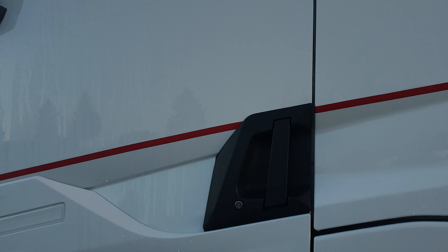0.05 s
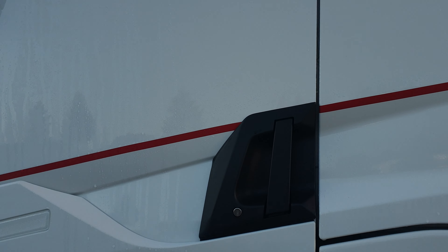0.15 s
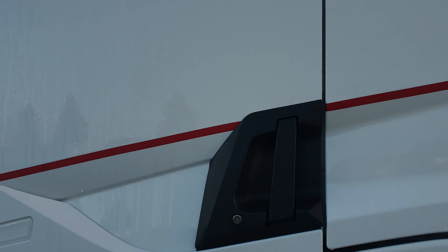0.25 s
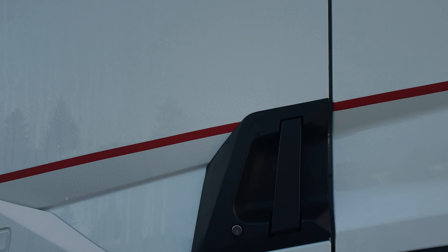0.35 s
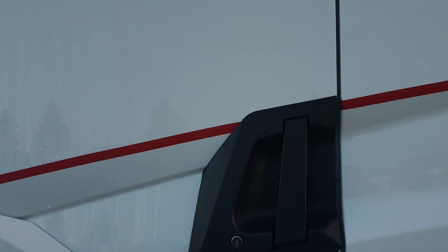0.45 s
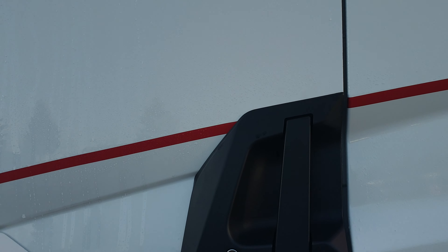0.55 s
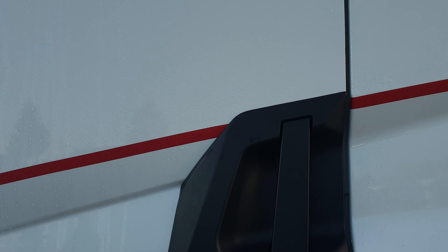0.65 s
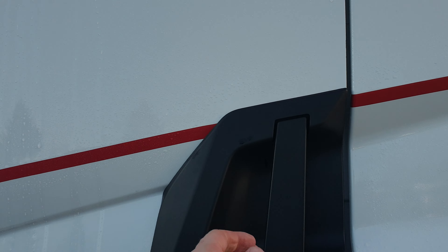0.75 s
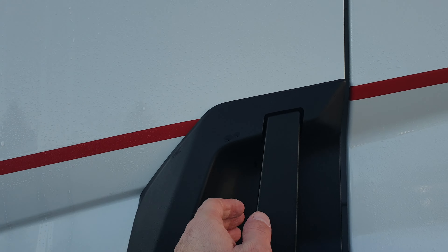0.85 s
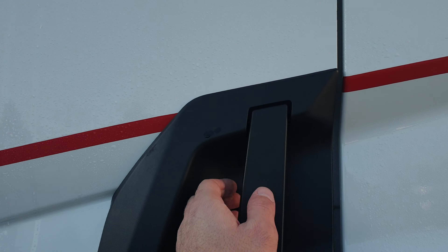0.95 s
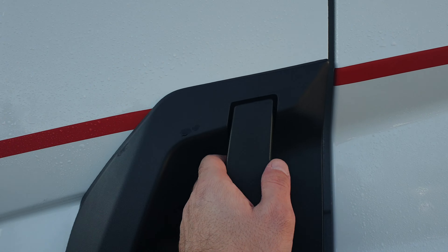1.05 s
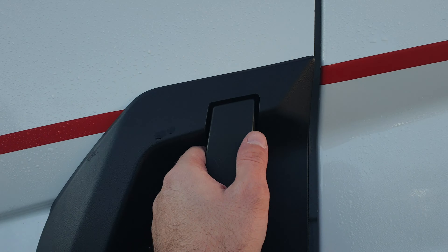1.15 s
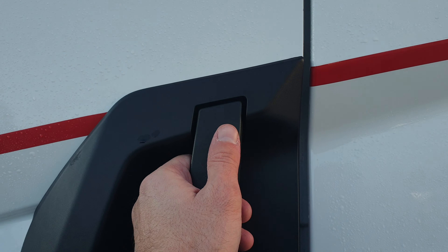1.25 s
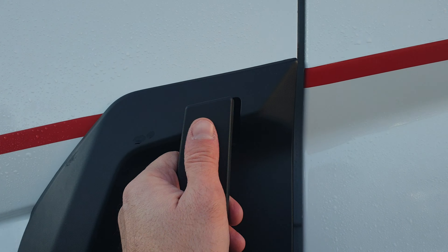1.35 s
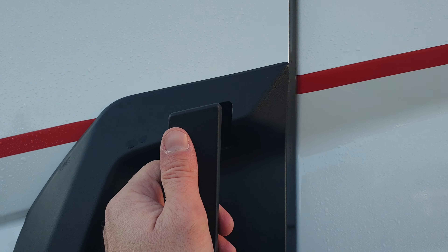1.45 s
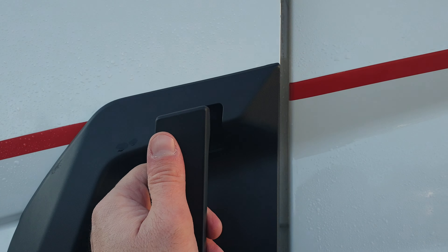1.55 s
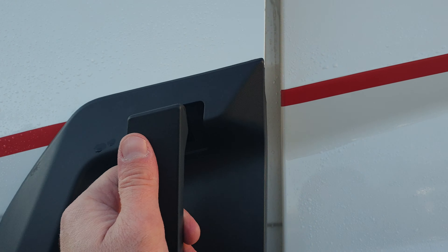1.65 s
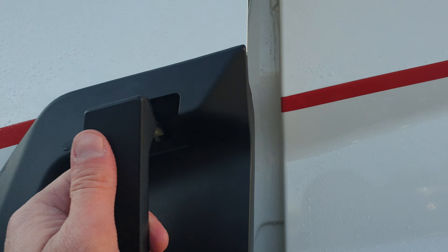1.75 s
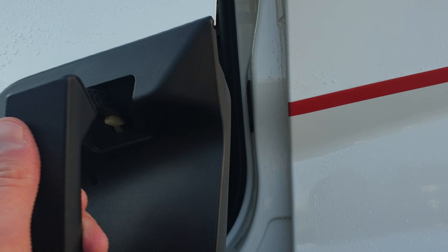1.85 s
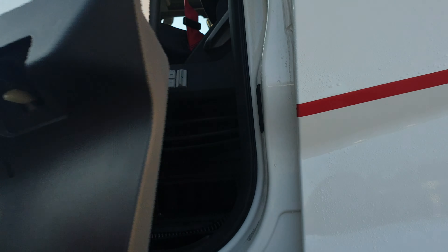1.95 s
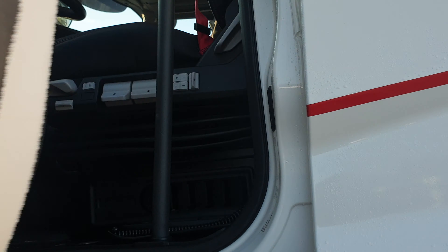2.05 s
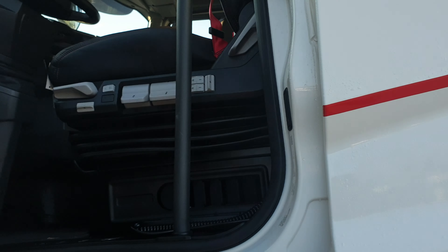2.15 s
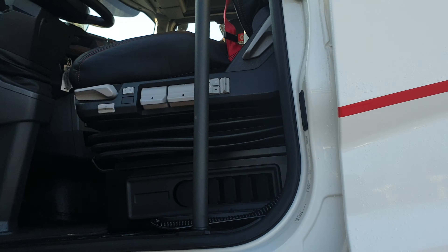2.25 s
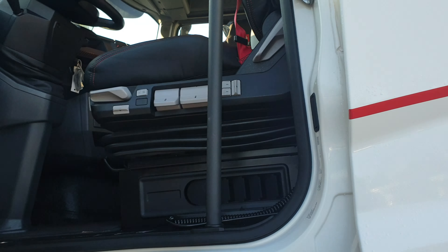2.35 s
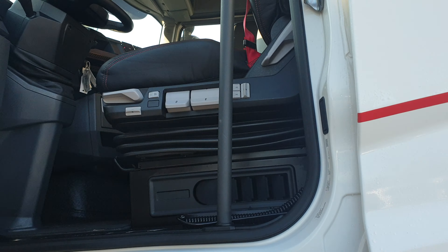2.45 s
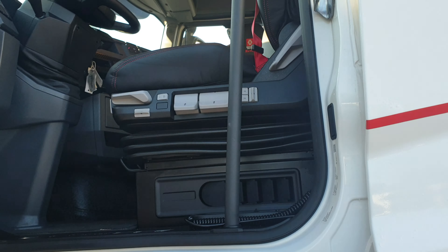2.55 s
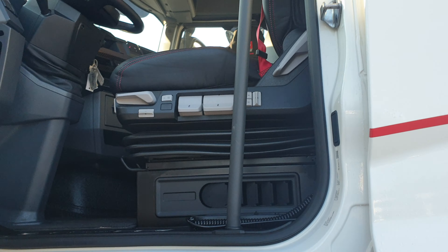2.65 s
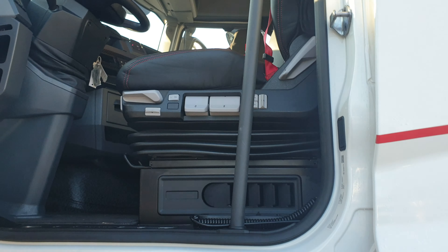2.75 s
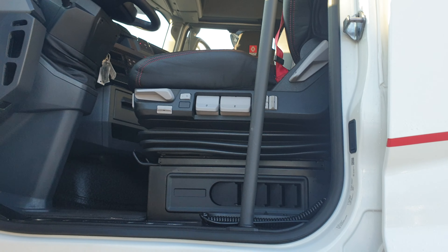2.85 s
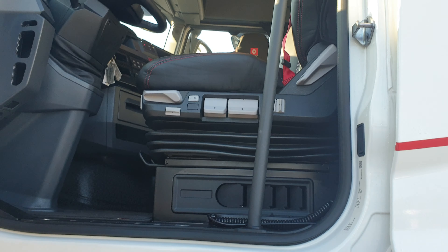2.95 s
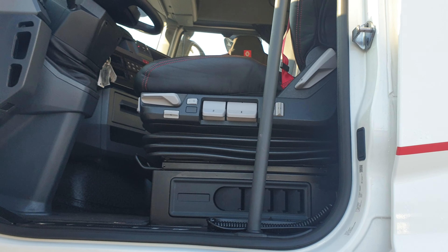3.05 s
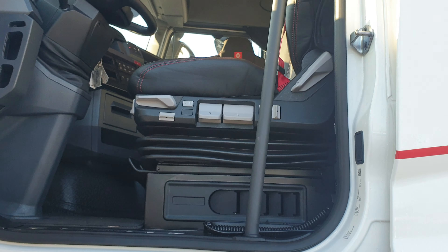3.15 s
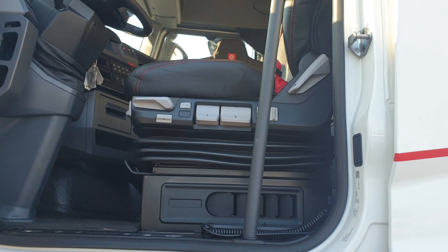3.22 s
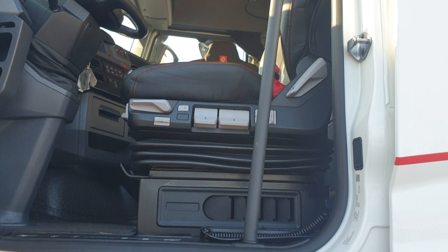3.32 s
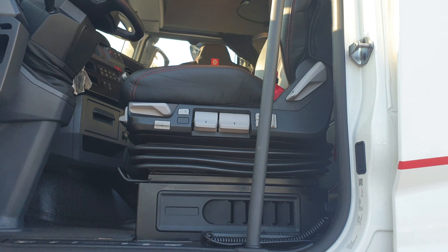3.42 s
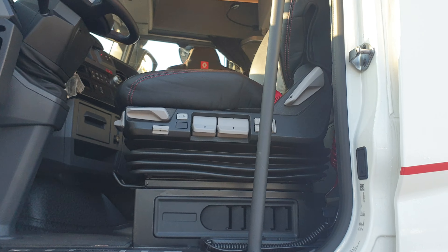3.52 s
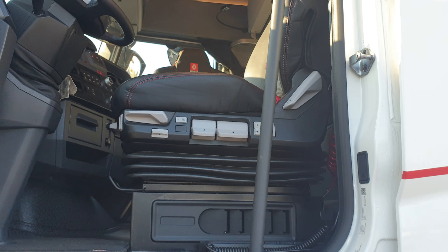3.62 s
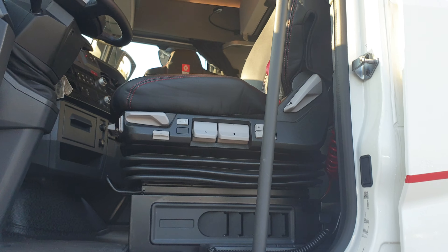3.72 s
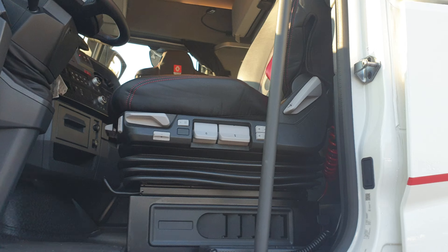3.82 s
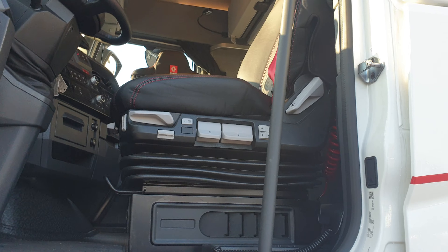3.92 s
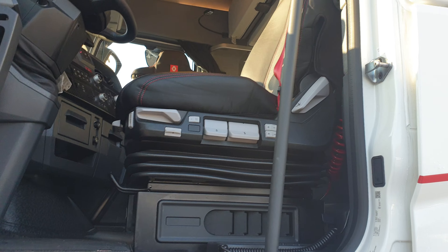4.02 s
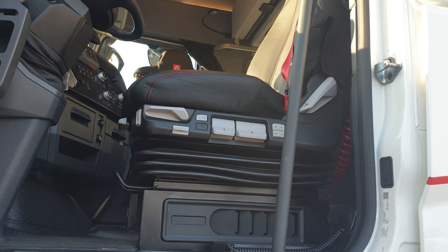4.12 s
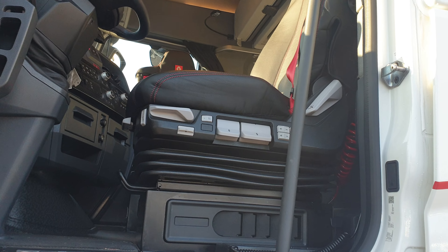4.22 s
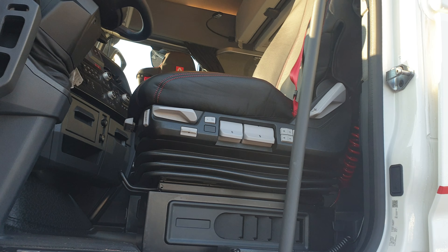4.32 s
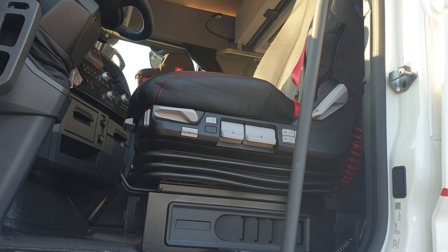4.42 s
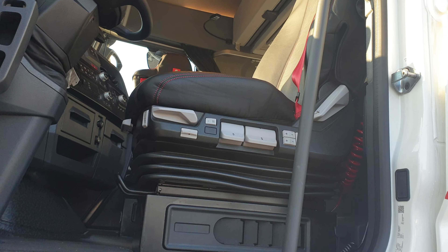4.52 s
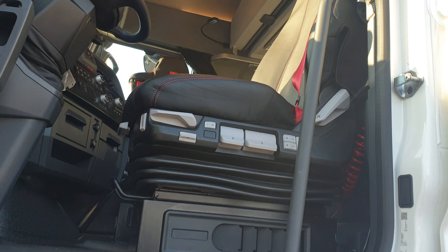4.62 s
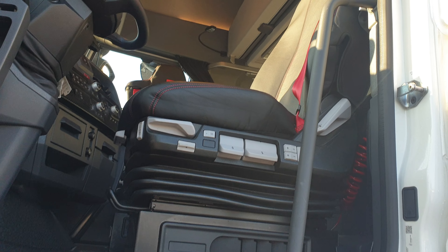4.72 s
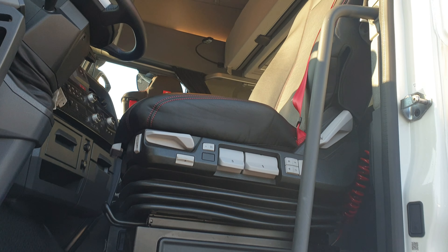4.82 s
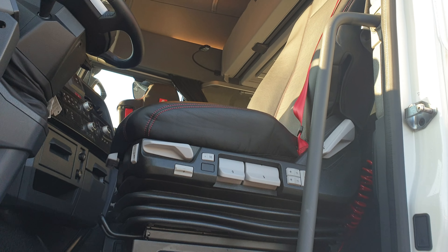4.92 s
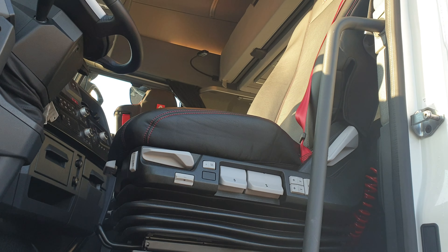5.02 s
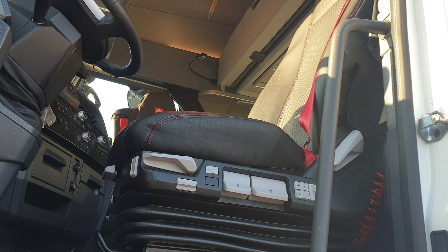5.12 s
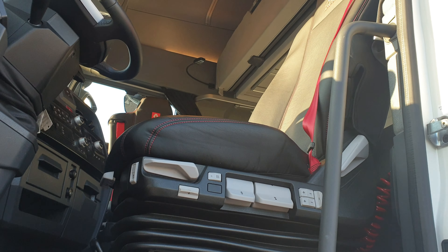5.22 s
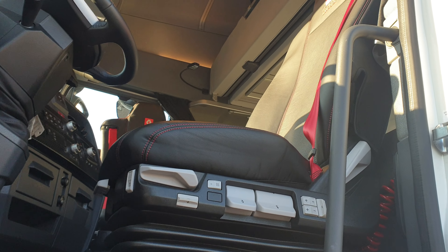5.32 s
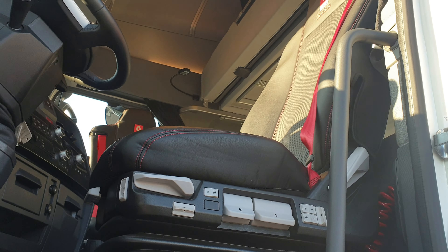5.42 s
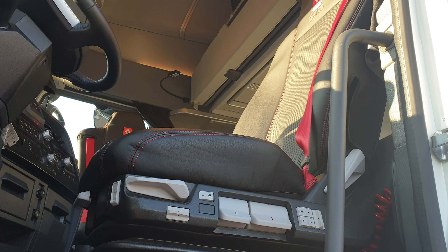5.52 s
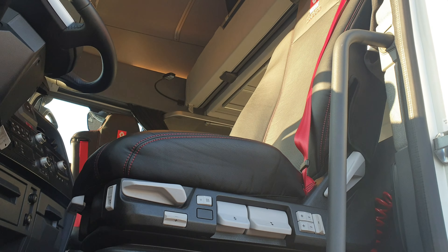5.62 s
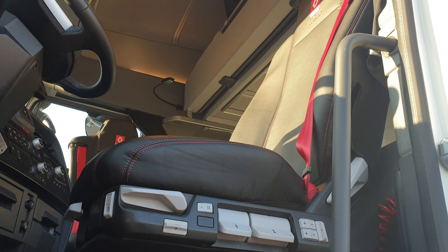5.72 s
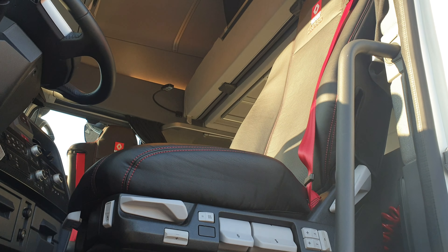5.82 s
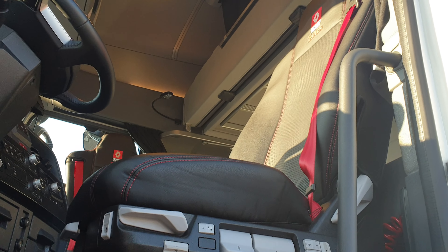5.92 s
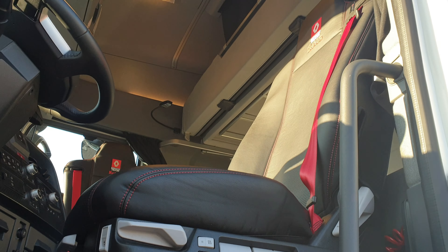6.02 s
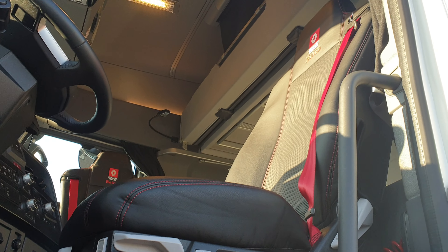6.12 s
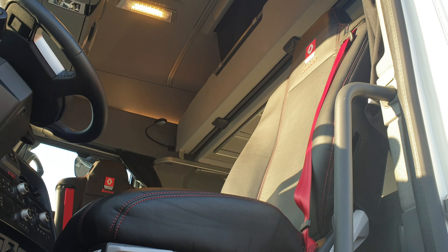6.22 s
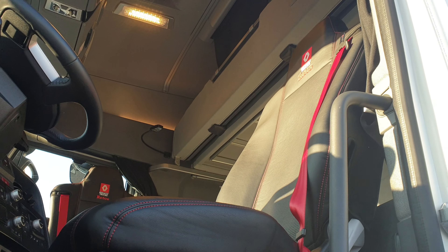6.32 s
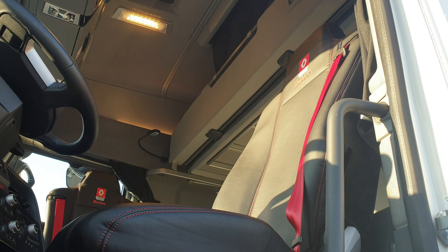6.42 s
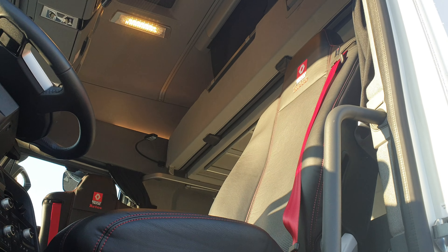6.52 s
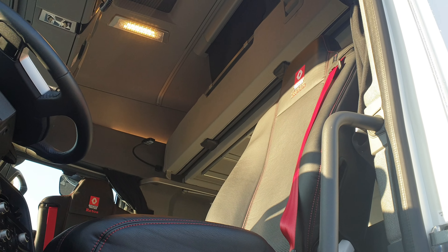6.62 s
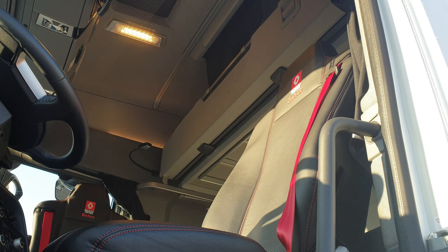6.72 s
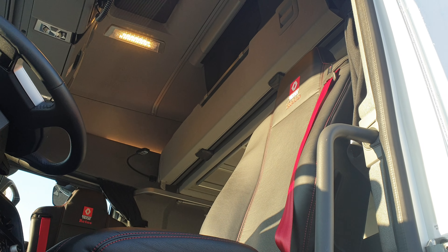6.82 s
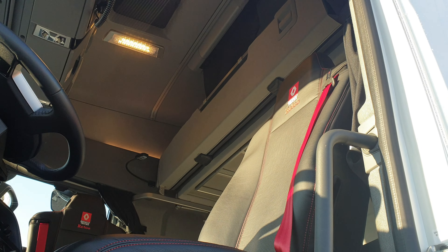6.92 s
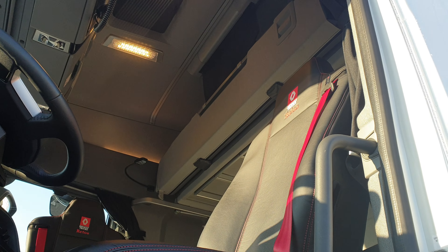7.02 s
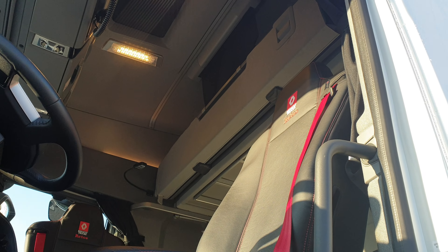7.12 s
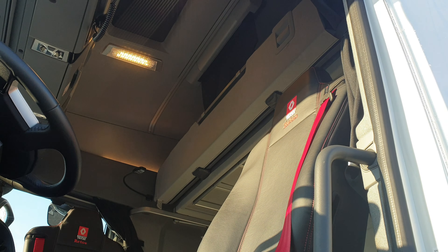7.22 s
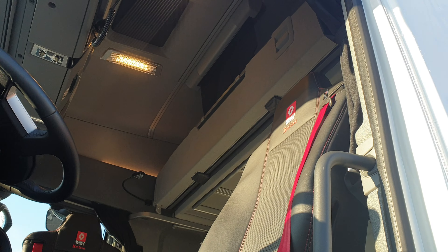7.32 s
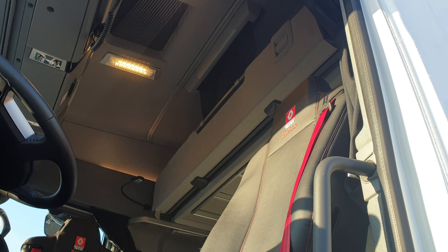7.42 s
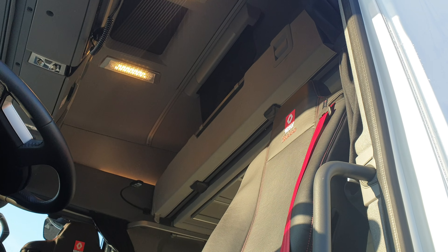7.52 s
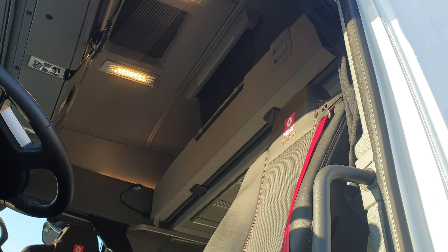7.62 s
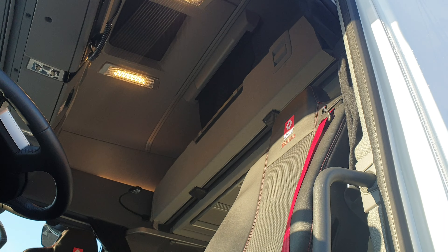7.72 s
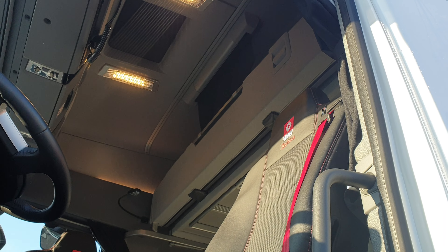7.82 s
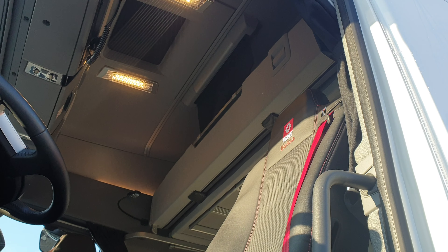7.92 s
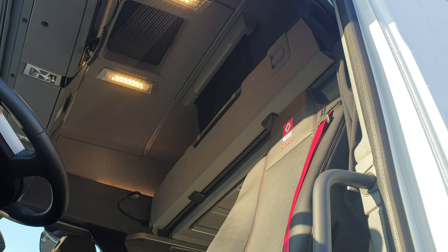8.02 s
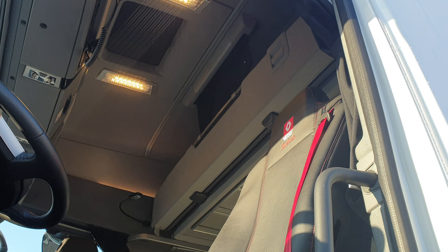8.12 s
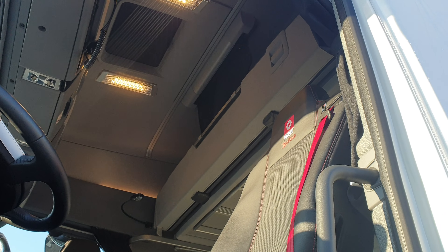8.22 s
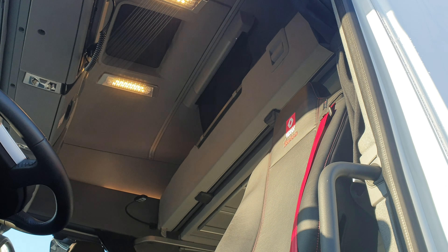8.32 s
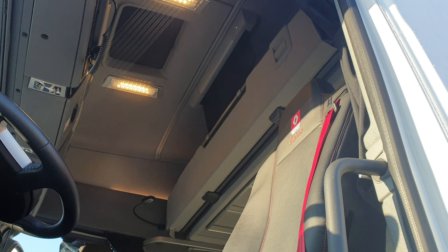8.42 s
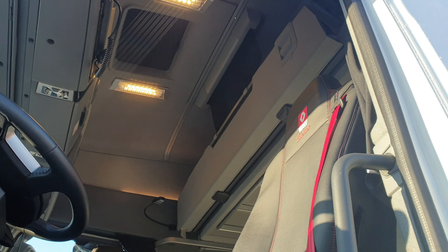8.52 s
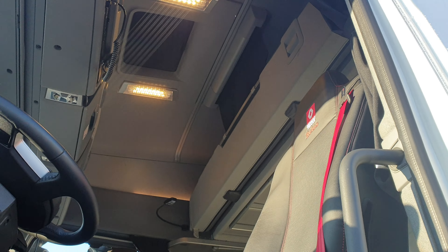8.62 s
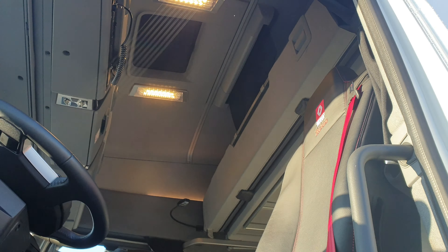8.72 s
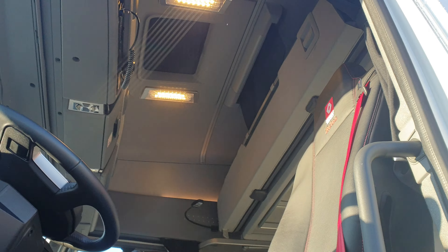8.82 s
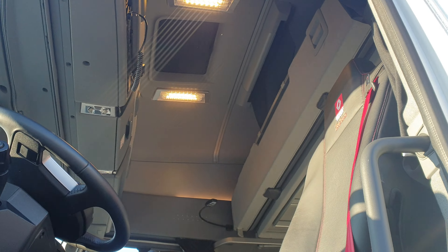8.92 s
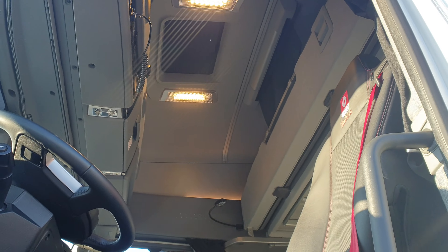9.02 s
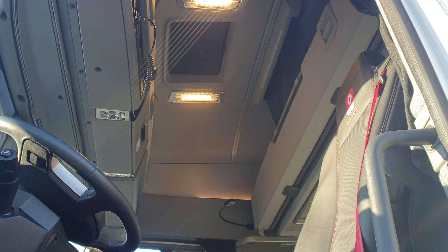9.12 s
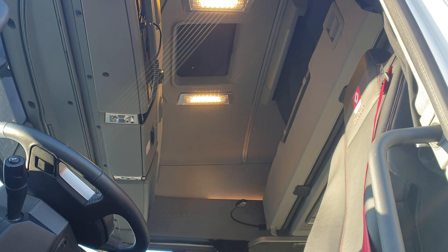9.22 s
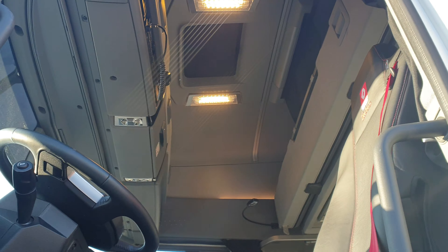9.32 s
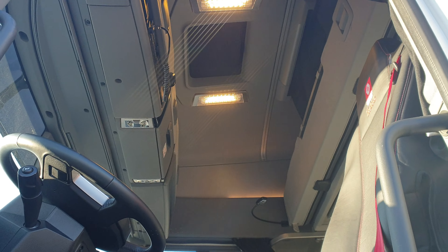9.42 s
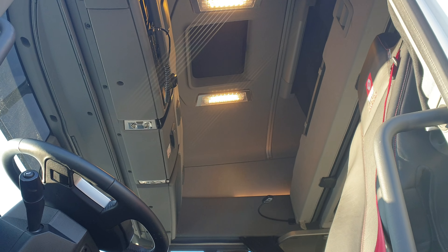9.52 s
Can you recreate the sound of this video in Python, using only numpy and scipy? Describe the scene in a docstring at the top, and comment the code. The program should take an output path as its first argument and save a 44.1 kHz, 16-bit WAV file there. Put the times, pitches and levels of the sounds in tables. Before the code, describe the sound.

A large diesel idles close by with a steady low hum and soft clatter. Small handle clicks lead to a loud latch snap and dull panel thud, then about a second later a bright, hard knock as the truck door reaches its stop. Afterwards mostly engine, faint sleeve rustle and a few tiny ticks near the end. Outdoors, dry, handheld stereo phone close to the door.

```python
"""Truck cab door opened beside an idling diesel

A hand takes the handle, the latch lets go with a thud and a snap, the door swings out and knocks against
its stop: noisy blows ring panel modes and small hardware. A six-cylinder diesel idles close by, as steady tones
over shaped noise. Sleeves hiss as the hand-held phone moves about, which also changes how loud the engine
arrives; a low traffic drone comes from further off."""
import sys
import numpy as np
from scipy import signal
from scipy.fft import rfft, irfft, next_fast_len
from scipy.io import wavfile
from scipy.ndimage import uniform_filter1d

SR = 44100
rng = np.random.default_rng(int(sys.argv[2]) if len(sys.argv) > 2 else 0)


def boost_factor(decibels):
    """Convert a level in decibels to a linear amplitude factor."""
    exponent = np.asarray(decibels, float) / 20
    return 10 ** exponent


def unload_wav(signal):
    """Save mono or channel-first audio to the path in sys.argv[1] as 16-bit WAV at rate SR, clipped to [-1, 1]."""
    wavfile.write(
        sys.argv[1],
        SR,
        np.round(np.clip(np.atleast_2d(signal).T, -1, 1) * 32767).astype(np.int16),
    )


N = 421596
T = np.arange(N) / SR  # s

SHAFT_HZ = 700 / 60
ENGINE_LAG_S = 16 / SR  # engine sound reaches the left port this much later

# How the phone's left and right ports hear the engine and the cloth.
# Each row: frequency in Hz, left minus right in dB, share of the sound common to both (0-1).
PORT_BALANCE = [(61.1, 2.5, 0.9), (130, 6.5, 0.96), (215, 5, 0.95), (410, 2.5, 0.98), (686, 2, 0.5),
                (1150, 4, 0.37), (2233, -6, 0.49), (4200, 2.5, 0), (7600, -9, 1), (15100, -3.5, 0.9)]


def unit(x):
    """Scale to rms 1."""
    return x / np.sqrt(np.mean(x ** 2) + 1e-30)


def on_log(table, hz, axis=1):
    """Read a column of a frequency table along a log frequency axis."""
    rows = np.array(table, float)
    return np.interp(np.log(hz + 1), np.log(rows[:, 0] + 1), rows[:, axis])


def walk(rate):
    """Random levels held 1 / rate s and smoothed twice; rms 1."""
    hold = int(SR / rate)
    steps = np.repeat(rng.standard_normal(N // hold + 1), hold)
    slewed = uniform_filter1d(uniform_filter1d(steps, hold), hold)
    return unit(slewed[:N])


def ring(x, hz, width):
    """Two-pole resonance, gain 1 at its centre."""
    return signal.lfilter(*signal.iirpeak(hz, hz / width, SR), x)


def ports(excite, colour, lag_s):
    """Coloured noise at two ports: a common part that reaches the left late, and a part of each port's own."""
    size = next_fast_len(N)
    hz = np.arange(size // 2 + 1) * SR / size
    common, left, right = (rfft(excite * rng.standard_normal(N), size) for _ in range(3))
    share = np.clip(on_log(PORT_BALANCE, hz, axis=2), 0, 1)
    tilt = boost_factor(on_log(PORT_BALANCE, hz) / 2)
    late = common * np.exp(-2j * np.pi * hz * lag_s)
    left = tilt * (np.sqrt(share) * late + np.sqrt(1 - share) * left)
    right = (np.sqrt(share) * common + np.sqrt(1 - share) * right) / tilt
    coloured = boost_factor(on_log(colour, hz)) * np.array([left, right])
    return unit(irfft(coloured, size)[:, :N])


def add(out, s, pair, pan_db):
    """Lay a short left-right sound into the scene, panned by left minus right dB."""
    i = int(s * SR)
    panned = pair * boost_factor(np.array([[pan_db], [-pan_db]]) / 2)
    out[:, i:i + pair.shape[1]] += panned[:, :N - i]


def door():
    """Blows on the door: a soft push with a fading shudder rings the panel modes nearest the blow's pitch."""
    # Modes of the door skin and frame.
    # Each row: frequency in Hz, relative level in dB, 60 dB decay time in s.
    door_modes = [(69, 6, 0.47), (96.1, -3, 0.28), (119.3, 3, 0.11), (152, -4, 0.22), (210, -6, 0.22),
                  (239, -1, 0.15), (290.8, -5.5, 0.26), (336, 4.5, 0.13), (375.5, -6, 0.16),
                  (415.5, -8, 0.19), (455, -6, .1), (505, -6, .09), (569, -4, .09), (648, -4, .09),
                  (735, -4, .08), (830, -4, .08), (940, -2, .08)]
    # Blows on the door.
    # Each row: start in s, peak in dB before panning, shudder in s, best excited pitch in Hz, spread in octaves.
    thuds = [(1.386, -25.5, 0.024, 286, 0.97), (1.416, -9, 0.0045, 170, 0.76),
             (1.424, -13.5, 0.015, 256, 0.96), (1.44, -18.5, 0.027, 340, .7),
             (1.462, -18.5, 0.014, 298, 0.92), (1.476, -15, 0.013, 300, 0.83),
             (1.484, -17.5, 0.014, 367, 0.75), (1.502, -14.5, 0.023, 135, 0.6),
             (2.269, -25, 0.0092, 334, 0.44), (2.333, -27.5, 0.023, 210, 0.61),
             (2.547, -12, 0.031, 380, 1.3), (2.554, -15.5, 0.01, 130, 0.9), (2.680, -32.5, 0.012, 450, 1.1),
             (3.340, -32.5, 0.05, 477, 0.89), (3.565, -32.5, 0.014, 244, 0.61),
             (9.480, -21, 0.22, 109.3, 1.9)]
    push_cycles = 0.75  # contact lasts this many cycles of the highest well-excited pitch
    out, t = np.zeros((2, N)), T[:SR // 2]
    for s, db, shudder_s, centre_hz, octaves in thuds:
        push = np.sin(np.pi * np.minimum(t * centre_hz * 2 ** octaves / push_cycles, 1))
        common, *own = rng.standard_normal((3, len(t)))
        shudder = (common + 0.42 * np.array(own)) * np.exp(-(t / shudder_s) ** 2)
        force = push / push.sum() + 0.071 * shudder
        modes = np.zeros(len(t))
        for hz, mode_db, t60 in door_modes:
            miss_db = 10.7 * (np.log2(hz / centre_hz) / octaves) ** 2
            modes += boost_factor(mode_db - miss_db) * np.sin(2 * np.pi * hz * t) * 1000. ** (-t / t60)
        sound = signal.fftconvolve(force, modes[None], axes=1)[:, :len(t)]
        # a free panel radiates no steady pressure: its back cancels the deepest bass
        sound = signal.lfilter(*signal.butter(2, 45, "high", fs=SR), sound)
        add(out, s, sound * boost_factor(db) / np.abs(sound).max(), pan_db=3.5)
    return out


def metal(envelope, low_db, centre_hz, bright_hz, grit_db, spike):
    """Noisy contact under an envelope, ringing in the hardware; partly alike in both ports."""
    # Resonances of latch, handle and stop hardware, the first eight below 3 kHz.
    # Each row: frequency in Hz, width in Hz, relative level in dB.
    hardware = [(620, 150, -6), (860, 150, -5), (1100, 90, 0), (1250, 80, 2), (1420, 140, -3),
                (1750, 150, -4), (2150, 250, -1), (2650, 350, -3), (3900, 600, -9), (5000, 500, -1),
                (5600, 500, -1), (6500, 500, -2), (7400, 1200, -4), (8500, 900, -7), (11000, 1500, -7),
                (14500, 2000, -13)]
    right_lag = 8  # samples
    focus_db = 28  # loss of a low mode one octave from the best excited pitch
    common, *own = rng.standard_normal((3, len(envelope)))
    shared = np.array([common, np.roll(common, right_lag)])
    force = (shared + .8 * np.array(own)) * envelope
    force[:, np.argmax(envelope)] += spike * envelope.max()
    low = sum(boost_factor(db - focus_db * np.log2(hz / centre_hz) ** 2) * ring(force, hz, width)
              for hz, width, db in hardware[:8])
    high = sum(boost_factor(db) * ring(force, hz, width) for hz, width, db in hardware[8:])
    grit = signal.lfilter(*signal.butter(2, 5500, "high", fs=SR), force)  # contact noise that does not ring
    high = unit(high) + boost_factor(grit_db) * unit(grit)
    # softer contact is duller
    high = signal.lfilter(*signal.butter(2, min(bright_hz, SR / 2.5), fs=SR), high)
    return unit(high) + boost_factor(low_db) * unit(low)


def clicks():
    """Hard parts snap together: a millisecond rise and a quick fall."""
    # Snaps of the handle, latch and stop.
    # Each row: start in s, peak in dB before panning, part below 3 kHz over the treble in dB,
    # 60 dB decay time in s, left minus right in dB, best excited pitch below 3 kHz in Hz.
    snaps = [(0.3841, -23, 14, 0.0039, -13, 1510), (.4975, -28, 21, 0.0033, -15, 1500),
             (0.991, -26.5, 11, 0.036, -15.5, 1920), (1.0289, -32, 21, 0.023, -12, 1500),
             (1.3181, -19, 3, 0.017, -6, 2300), (1.3533, -30, 9, 0.021, -11, 1300),
             (1.416, -22, 18, 0.012, 0, 700), (1.4528, -2, 6, .013, -1.5, 1400),
             (1.462, -22, -3, .008, -1.5, 1400), (1.573, -29, 14, 0.015, -9, 2350),
             (2.016, -39, 4, 0.06, -3, 2000), (2.2682, -32, 8, 0.012, -2, 2000),
             (2.294, -33, 17, 0.007, -11, 1600), (2.513, -35, 12, .03, 5, 1900),
             (2.5415, -3.5, -8, .028, 3, 1600), (3.338, -39, 22, 0.11, 7, 900),
             (3.486, -48, -2, 0.011, 0, 1350), (3.545, -46, -7, .012, -3, 1350),
             (3.608, -45, -7, 0.031, -3, 1350), (3.821, -40.5, 9, 0.033, -4, 1350),
             (5.335, -48, -6, .01, 0, 1350), (5.47, -49, -6, .01, 0, 1350),
             (5.505, -46, -4, 0.028, 4, 1350), (7.349, -48, -0.5, 0.024, -4, 1350),
             (8.578, -32, 13, 0.003, -15, 1900), (8.647, -27, 22, .025, -5, 1180),
             (8.696, -29, 20, .012, -5, 1750)]
    hard_hz, dulling_hz_per_db = 14700, 242  # the more a click sits below 3 kHz, the duller its treble
    out, t = np.zeros((2, N)), T[:SR // 8]
    for s, db, low_db, t60, pan_db, centre_hz in snaps:
        bright_hz = hard_hz - dulling_hz_per_db * low_db
        envelope = (1 - np.exp(-t / .0004)) * 1000. ** (-t / max(t60, .003))
        # the spike is a multiple of the rattle's peak; the grit is an unringing crack
        pair = metal(envelope, low_db, centre_hz, bright_hz, grit_db=-3, spike=3.5)
        add(out, s, pair * boost_factor(db) / np.abs(pair).max(), pan_db)
    return out


def scrapes():
    """Parts slide over each other in uneven small slips."""
    # Short scrapes of the hardware.
    # Each row: start in s, time held in s, treble level in dB before panning,
    # part below 3 kHz over the treble in dB, best excited pitch below 3 kHz in Hz.
    slides = [(.992, 0.028, -54, 16, 1180), (1.028, 0.018, -54, 16, 1350), (1.03, .012, -58, 15, 2200),
              (1.066, 0.04, -56, 13, 1200), (1.365, 0.043, -49.5, 7, 1400), (1.409, 0.029, -43, 6, 1510),
              (1.457, .015, -52, 13, 1000), (1.475, .018, -51, 12, 1000), (1.481, .012, -53, 10, 2500),
              (2.298, 0.012, -57, 0, 2000), (2.546, 0.013, -29.5, 5.5, 1840), (2.638, .03, -57, -6, 2000),
              (2.915, .04, -61, -6, 2000), (5.301, .016, -56, -8, 2000), (8.636, .028, -51.5, 17, 1120),
              (8.650, .02, -57, 15, 2400), (8.682, .011, -51, 15, 2400), (8.694, .012, -53, 17, 1750),
              (9.481, 0.052, -66, 18, 2000)]
    rise_s, fade_s = .004, .009
    out, t = np.zeros((2, N)), T[:SR // 5]
    for s, held, db, low_db, centre_hz in slides:
        slips = boost_factor(2.5 * np.repeat(rng.standard_normal(len(t) // 100 + 1), 100)[:len(t)])
        shape = np.minimum(t / rise_s, 1) * np.exp(-np.maximum(t - held, 0) / fade_s)
        # the grit is the plain hiss of rubbing surfaces
        pair = metal(slips * shape, low_db, centre_hz, bright_hz=13900, grit_db=-4, spike=0)
        add(out, s, pair * boost_factor(db) * np.sqrt(np.mean(shape ** 2)), pan_db=3.5)
    return out


def tone(multiple, db, waver_db):
    """One steady engine tone whose level wavers slowly; reflections shift it a little between the ports."""
    hz = multiple * SHAFT_HZ
    side = np.array([[1], [-1]])
    shift = side * 0.14 * walk(1.646)  # radians
    phase = 2 * np.pi * (hz * (T - side * ENGINE_LAG_S / 2) + rng.random()) + shift
    level = boost_factor(db + waver_db * walk(3.01) + side * on_log(PORT_BALANCE, hz) / 2)
    return np.sqrt(2) * level * np.sin(phase)


def engine():
    """Governed idle: sharp tones over rumble, a clatter that pulses with each firing, and a whine."""
    # Engine tones. Each row: multiple of shaft speed, level in dB when the rumble is at tone_ref_db.
    engine_tones = [(3, -70), (4, -53), (5, -54.5), (5.5, -50), (7, -52.5), (8, -55.5), (9, -52),
                    (10, -50.5), (11, -54.5), (12, -56.5), (13, -59), (14, -60), (17, -56.5), (19, -56.5),
                    (21, -70), (22, -56), (23, -62.5), (24, -65), (25, -61), (32, -58), (34, -57.5),
                    (35, -63.5), (40, -66.5), (43, -62.5), (48, -66.5), (56, -62.5), (61, -62), (72, -62),
                    (84, -60), (108, -60.5)]
    # Low rumble of the engine. Each row: frequency in Hz, relative density in dB per Hz.
    rumble_colour = [(12, -39), (20, -3), (48, -9.5), (75, 3), (123, -3.5), (183, -6), (222, -10.5),
                     (264, -6.5), (315, -10), (387, -5), (461, -12), (585, -10), (900, -21), (1170, -65.5),
                     (1980, -120)]
    # Sharper clatter of the engine. Each row: frequency in Hz, relative density in dB per Hz.
    clatter_colour = [(410, -20.5), (700, -4), (886, -2.5), (946, -6), (1420, -6), (1520, -6), (1730, -7),
                      (1920, -6.5), (2490, -9), (2960, -18), (4320, -25), (6480, -23.5), (9230, -41),
                      (11200, -33.5), (16000, -43)]
    # Gear and fan whine, louder through the open cab.
    # Each row: frequency in Hz, width in Hz, relative level in dB.
    whine_bands = [(1173, 42, -7.5), (1700, 87, -3.5), (2085, 130, -10), (2250, 145, -9.5), (2444, 310, -7)]
    # Pure note in the whine: multiple of shaft speed, level in dB relative to the whine noise.
    whine_note = (210.86, -1.2)
    # Engine as heard where the phone is held.
    # Each row: time in s, level in dB re the usual spot, extra dB of the deep boom as the door swings.
    at_phone = [(0, 1, -0.5), (1.0, 1, 1), (1.4, 2.5, -7), (1.7, -2, -3), (2.05, -1, 3), (2.4, -1, 4),
                (2.75, -1.5, -4.5), (3.3, -4, -1.5), (4.199, -4, 2), (4.65, -5, 0), (4.8, -2, 0),
                (5.15, 1, 2.5), (6.499, -0.6, 2), (8.799, .5, -0.5), (9.2, 0, 1), (9.56, 0.5, -1)]
    # base levels in dB at the usual spot
    boom_db, drone_db, rumble_db, clatter_db, whine_db = -40.5, -51, -44.5, -47.5, -78
    tone_ref_db = -43.5
    at_cab_s, step_up_s = 5.33, 0.84  # the phone reaches the cab opening, over this long
    cab_drone_db, cab_whine_db = 4.5, 19  # what the open cab adds

    s, *columns = np.transpose(at_phone)
    heard_db, swing_db = (np.interp(T, s, c) for c in columns)
    at_cab = 1 / (1 + np.exp((at_cab_s - T) / (step_up_s / 4)))

    tones = sum(tone(m, db, waver_db=1.5) for m, db in engine_tones) * boost_factor(rumble_db - tone_ref_db)
    boom = tone(6, boom_db + swing_db, waver_db=1.5)
    drone = tone(15, drone_db + cab_drone_db * at_cab, waver_db=1.)

    rumble = ports(boost_factor(0.26 * walk(8.6)), rumble_colour, ENGINE_LAG_S) * boost_factor(rumble_db)
    firing = (6 * SHAFT_HZ * T) % 1  # 0-1 between firings, six a shaft turn
    knock = 1 + 0.23 * np.exp(-firing / 0.21)
    clatter = ports(knock * boost_factor(.6 * walk(12.)), clatter_colour, ENGINE_LAG_S)

    # the whine noise is the clatter passed twice through each resonance
    whine = unit(sum(boost_factor(db) * ring(ring(clatter, hz, width), hz, width) for hz, width, db in whine_bands))
    whine = whine + tone(whine_note[0], whine_note[1], waver_db=1.5)
    whine = whine * boost_factor(whine_db + cab_whine_db * at_cab)
    return (tones + boom + drone + rumble + clatter * boost_factor(clatter_db) + whine) * boost_factor(heard_db)


def rustle():
    """Sleeves close to the phone: cloth hiss, patchy and slightly grainy."""
    # Level of the cloth hiss. Each row: time in s, level in dB.
    rustle_level = [(0, -55), (1.0, -57), (1.6, -62), (2.7, -62), (3.3, -69), (4.4, -75), (5.3, -63),
                    (5.7, -68), (6.3, -81), (7.9, -79), (8.75, -65), (9.56, -71)]
    # Colour of the cloth hiss. Each row: frequency in Hz, relative level in dB.
    cloth_colour = [(1760, -32), (3000, -2), (3550, -8), (4760, -4), (5250, -4), (6040, 0), (8950, -4),
                    (11100, -1), (14700, -6), (16000, -10)]
    grain = boost_factor(1.5 * walk(25.) + 2.5 * rng.standard_normal(N))
    return ports(grain, cloth_colour, 0.) * boost_factor(np.interp(T, *np.transpose(rustle_level)))


def traffic():
    """A blurred low note from further off: a drifting pitch whose level flutters at random."""
    # Level of the traffic drone. Each row: time in s, level in dB before flutter and panning.
    traffic_level = [(0, -43), (.6, -48.5), (4.1, -49), (4.7, -54), (5.3, -46.5), (7.0, -43), (8.4, -40.5),
                     (9.56, -59)]
    pitch_hz = 47.9 * (1 + .03 * walk(.5) + .04 * walk(8.))
    phase = 2 * np.pi * np.cumsum(pitch_hz) / SR
    pan_db = np.array([[1.5], [-1.5]])
    return np.sin(phase) * boost_factor(np.interp(T, *np.transpose(traffic_level)) + 3 * walk(9.) + pan_db)


def scene():
    """Door, engine, cloth and traffic together; open air, so no room."""
    return door() + clicks() + scrapes() + engine() + rustle() + traffic()


def roll_off(x):
    """The treble ends steeply here."""
    return signal.sosfilt(signal.butter(12, 16840, fs=SR, output="sos"), x)


def record(dry):
    """The phone cuts the top steeply above 15.9 kHz."""
    low_pass = signal.ellip(8, .2, 60, 15900, fs=SR, output="sos")
    mix = signal.sosfilt(low_pass, dry)
    return roll_off(mix)


dry = scene()
out = record(dry)
unload_wav(out)
```